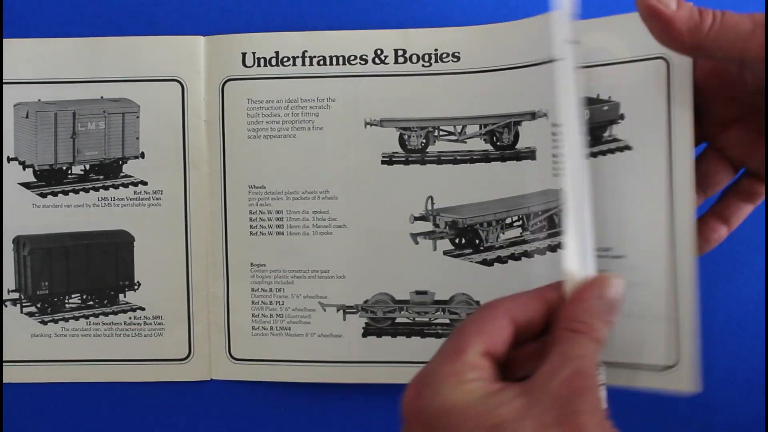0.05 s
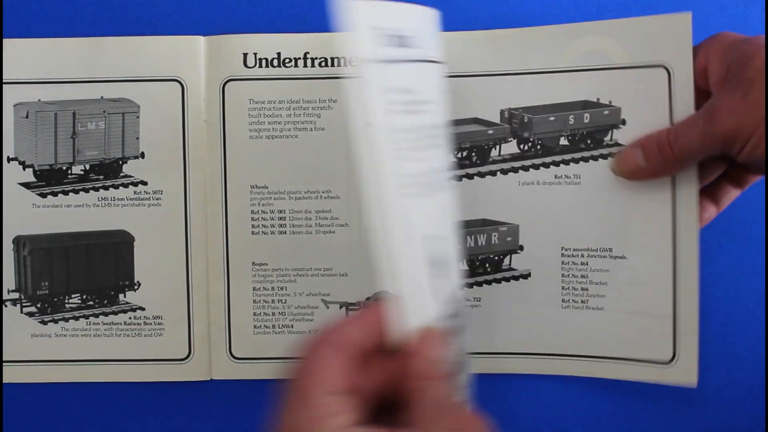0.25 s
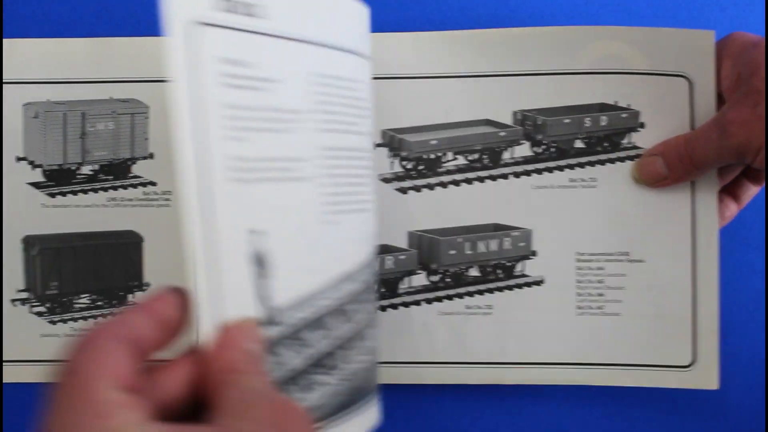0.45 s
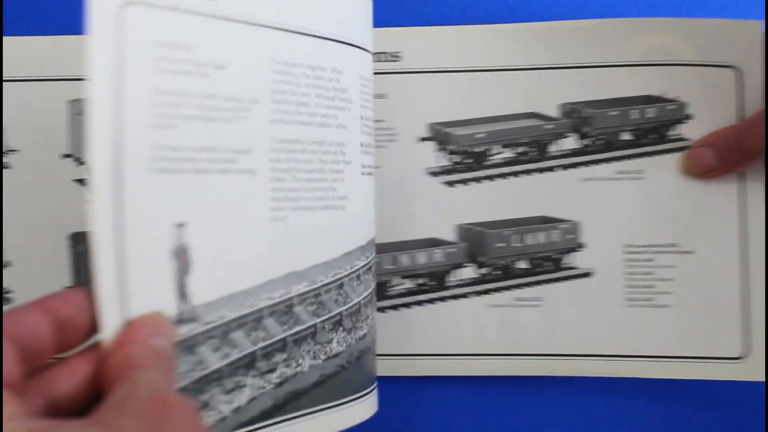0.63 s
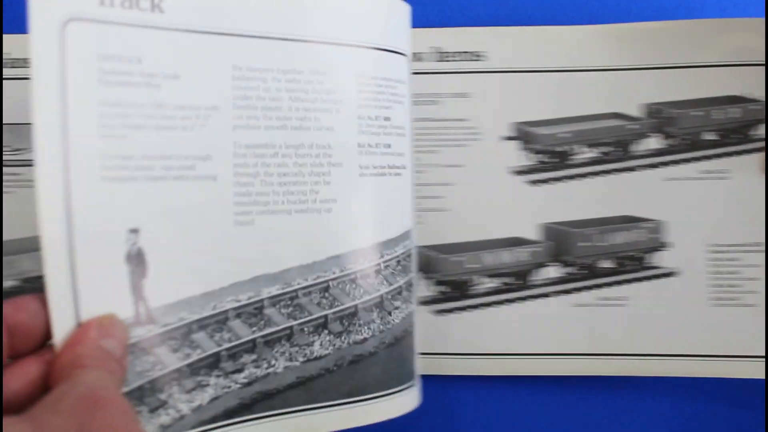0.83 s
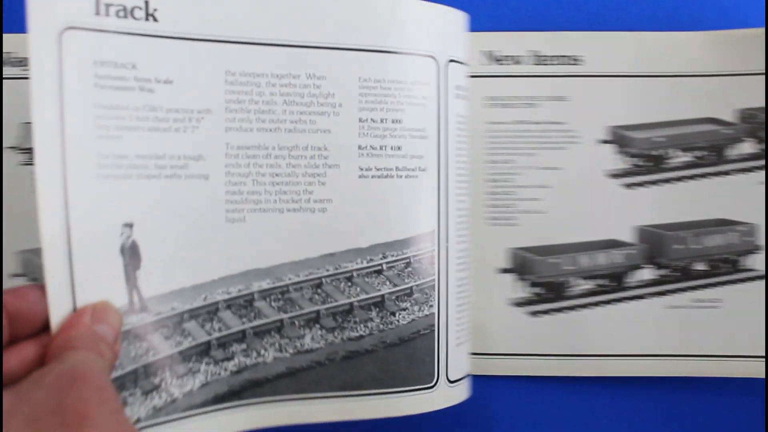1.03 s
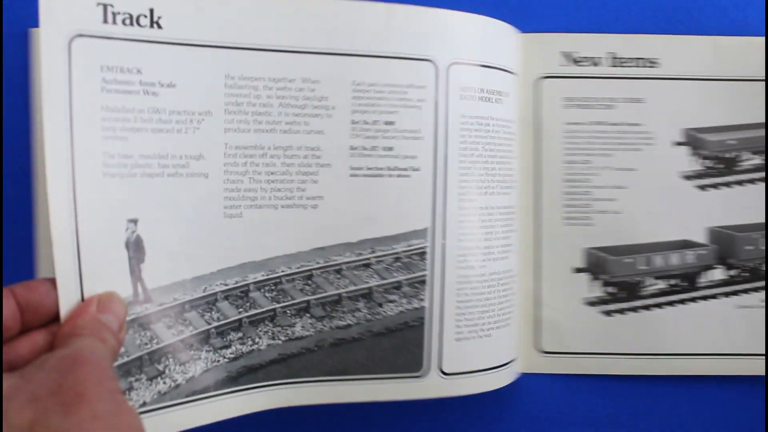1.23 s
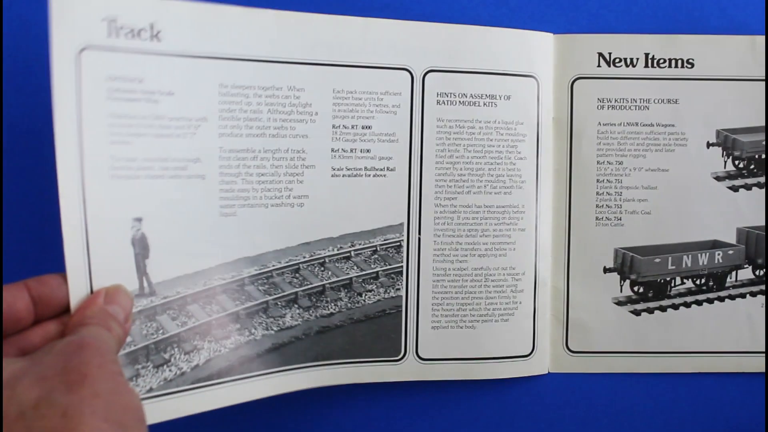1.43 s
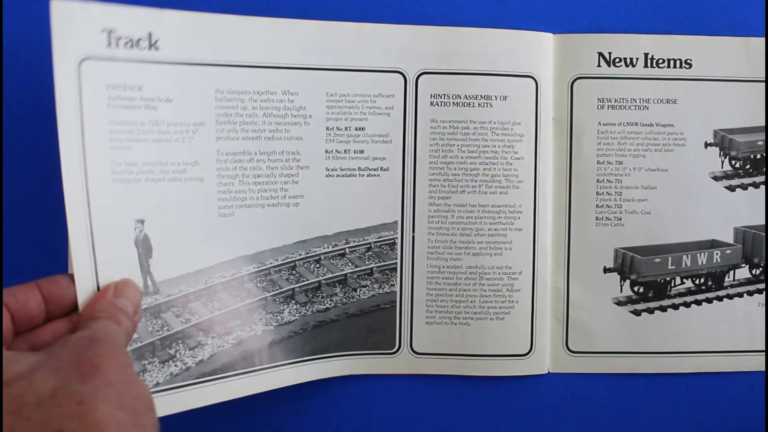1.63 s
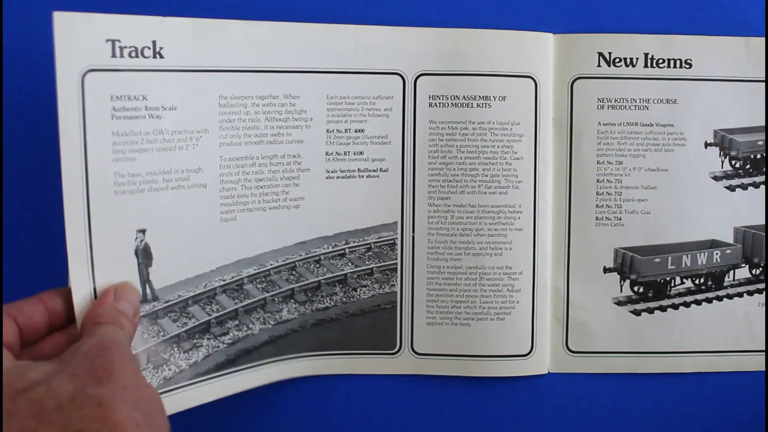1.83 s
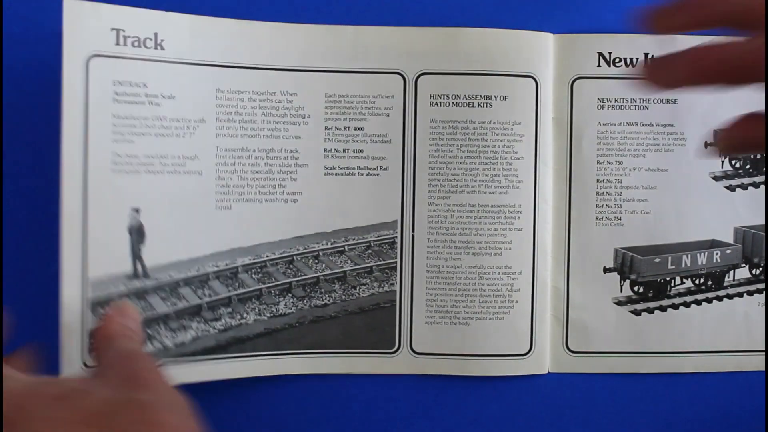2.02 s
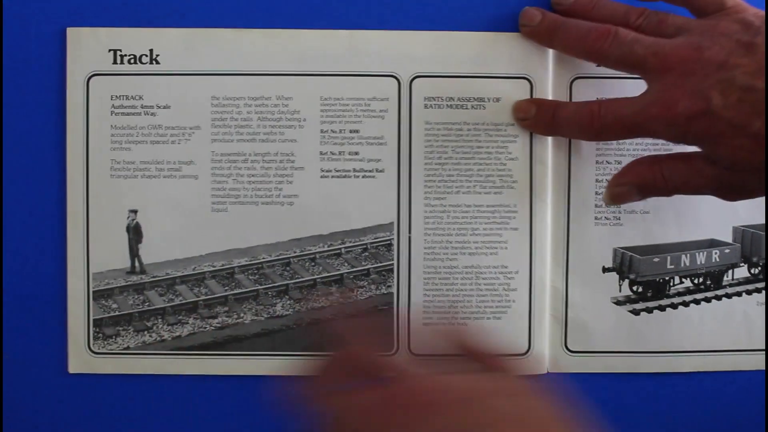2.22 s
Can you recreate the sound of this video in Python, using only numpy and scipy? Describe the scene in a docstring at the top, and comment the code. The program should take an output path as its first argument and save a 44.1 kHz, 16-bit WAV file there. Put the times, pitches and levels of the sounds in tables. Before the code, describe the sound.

A stiff catalogue page is turned close to the microphone in a small room: soft finger scraping and papery flicks, a bright sliding swish, then two sharp taps as it lands, over faint room hum.

```python
"""Turning a stiff catalogue page

A hand turns a page close to the microphone in a small room, over steady air noise and faint hum.
Fingers scrape and brush the paper: dense random clicks through filters, with a low resonant drone.
The sheet slides with a swish (the same clicks, plus a delayed copy), shivers and buckles in damped rings.
Two sharp taps, filtered impulses with table modes, land it flat."""
import sys
import numpy as np
from scipy import signal
from scipy.fft import rfft, irfft, next_fast_len
from scipy.io import wavfile
from scipy.ndimage import uniform_filter1d, map_coordinates

SR = 44100
rng = np.random.default_rng(int(sys.argv[2]) if len(sys.argv) > 2 else 0)


def to_wav(sig):
    """Store sig (one row per channel, or 1-D mono) as 16-bit WAV at the path in sys.argv[1].

    Samples outside -1..1 are clipped; the rate is SR.
    """
    pcm = np.clip(np.atleast_2d(sig), -1, 1) * 32767
    pcm = np.round(pcm).astype(np.int16)
    wavfile.write(sys.argv[1], SR, pcm.T)  # frames by channels


N = 100062

# Room air spectrum: f/Hz, relative level/dB
AIR_COLOUR = [(20, -1.5), (60, -12.5), (100, 8.5), (150, 2), (230, 2.5), (350, -2), (600, -1), (1200, -11),
              (2500, -27.5), (4300, -17), (5100, -14), (6200, -26), (9000, -24), (13000, -29), (15500, -49)]
AIR_DB = -53.5
# Hum partials: f/Hz, rms level/dB
HUM_PARTIALS = [(59, -65.5), (99, -90), (140, -62), (220, -65), (346, -70)]
HUM_WANDER_RAD, HUM_WANDER_HZ = 0.64, 7.82

# Near reflections: delay/s, level/dB
ROOM_ECHOES = [(.0061, -13.5), (.0099, -20.5)]
# Diffuse tail decay: f/Hz, t60/s
ROOM_DECAY = [(200, 0.5), (600, 0.17), (1400, 0.24), (3600, 0.19), (10000, 0.62)]
# Diffuse tail spectrum: f/Hz, relative level/dB
TAIL_COLOUR = [(100, 1), (600, 0), (1500, -2), (3200, -0.5), (6000, -10), (9000, -9), (16000, -1)]
ROOM_DB, ROOM_ONSET_S, ROOM_BUILD_S = -7, 0.004, 0.006

GRAINS_PER_S = 12000
FLUTTER_DB, RUB_FLUTTER_DB, FLUTTER_HZ = 0.8, 1.55, 45
# Fingers scraping the sheet: t/s, level before flutter/dB
RUB_LEVEL = [(0, -45.5), (.15, -46), (.18, -52), (.28, -56.5), (.34, -47), (.41, -51.5), (.6, -55.5),
             (.69, -58), (1.3, -55), (1.47, -54.5), (1.78, -60.5), (1.98, -54.5), (2.1, -62), (2.27, -63)]
# Scrape spectrum: f/Hz, relative level/dB
RUB_SPECTRUM = [(100, -14), (550, -5.5), (800, -2), (1150, -2), (1600, 1.5), (1950, -3), (2700, -9),
                (4700, -15), (7000, -24.5), (16000, -41)]
# Drone of the rubbed sheet: t/s, level/dB
DRONE_LEVEL = [(0, -48.5), (.12, -52.5), (.22, -51.5), (.36, -54), (.62, -50.5), (.72, -70), (2.27, -58)]
DRONE_HZ, DRONE_Q = 350, 5.6
# Light brushing of the moving sheet: t/s, level before flutter/dB
BRUSH_LEVEL = [(0, -50), (.035, -46.5), (.06, -57), (.15, -57.5), (.19, -47.5), (.26, -49.5), (.29, -56.5),
               (.40, -61), (.49, -55), (.57, -51), (.66, -52), (.76, -49.5), (.85, -46.5), (.92, -57),
               (1.6, -62), (1.68, -49.5), (1.71, -63.5), (2.19, -61.5), (2.23, -54), (2.27, -60)]
# Brush spectrum: f/Hz, relative level/dB
BRUSH_SPECTRUM = [(300, 2), (1000, 5), (2000, 5), (3500, 2), (5000, 1), (6500, -1.5), (9500, -3),
                  (13000, -6.5), (16000, -18)]

# Sheet sliding over its neighbour: t/s, gain/dB, spectral tilt about 4 kHz/(dB/octave)
SLIDE_PATH = [(.8, -100, 10), (.865, -41.5, 0.5), (.905, -43.5, -1), (.925, -37, -1), (.96, -36.5, -1),
              (.99, -39.5, -1.5), (1.1, -41, -0.5), (1.2, -41.5, -1.5), (1.28, -43, -1), (1.39, -46.5, -1),
              (1.43, -52, -6.5), (1.5, -100, 14)]
# Slide spectrum before tilt: f/Hz, relative level/dB
SLIDE_SPECTRUM = [(200, -18), (600, -10.5), (1500, -8.5), (2200, -5.5), (3000, 1.5), (4500, 1.5),
                  (5800, -1.5), (7500, -3), (10500, -5.5), (13500, -12), (16000, -21)]
# Lag of the swish off the page, shrinking as the sheet sinks: t/s, delay/s
REFLECTION_LAG = [(.92, .00117), (1.0, .00113), (1.15, .00099), (1.28, .00087), (1.42, .00064)]
REFLECTION_DB = -12

# Sheet shivers: t/s, level/dB, rise/s, fall/s, centre f/Hz, Q/1
SHIVERS = [(0.305, -44.5, 0.0098, 0.024, 900, 2.6), (.553, -39.5, 0.0088, 0.041, 485, 2.3),
           (0.8617, -34, 0.00056, .002, 2170, 3.7), (0.862, -35, .003, 0.023, 477, 2.3),
           (.885, -36.5, .015, 0.038, 760, 3.2), (1.402, -34, .0015, 0.011, 710, 1.8),
           (1.48, -52.5, 0.11, .04, 185, 2.4), (1.612, -23.5, 0.0034, 0.0086, 930, 2.35),
           (1.621, -42, 0.0027, 0.024, 122, 1.04), (1.645, -40.5, 0.027, 0.032, 2230, 3),
           (2.231, -51.5, 0.012, .03, 2780, 3.7)]

# Buckling flicks: t/s, level/dB, low ring f/Hz, upper ring f/Hz, upper ring level/dB,
# upper ring Q/1, crack level/dB, crumple level/dB, room level re ROOM_DB/dB
BUCKLES = [(.0345, -42, 1770, 3740, 0, 3.9, 12, 4.5, 1), (.2977, -36.5, 475, 980, 3, 3.3, 10, -7, 4),
           (.4354, -33, 454, 1600, 6, 3.6, 1, 1, -0.5), (.5298, -27.5, 493, 1310, 2.5, 3.2, 1, -0.5, 0),
           (.8614, -23.5, 800, 2000, -1.5, 9.4, -13, 2, -5),
           (1.3535, -38.5, 840, 1040, -21, 1.8, -18, 6, -15),
           (1.4094, -26.5, 810, 930, -12.5, 4.4, -26, -3.5, 7),
           (1.4192, -36, 900, 2880, 3.5, 3.5, -13, -17, -15), (1.513, -31.5, 630, 1000, -40, 3, -13, 2, -6),
           (1.9212, -33, 754, 1210, 7, 3.3, 7, -3.5, -1), (2.047, -41, 1240, 1410, 7, 8.4, -10, -4, -2),
           (2.2029, -26.5, 1880, 2400, -6.5, 6.5, -20, -7.5, -4)]
LOW_RING_Q = 2.38
# Crack spectrum: f/Hz, relative level/dB
CRACK_COLOUR = [(100, -56), (1000, 6), (3800, 2), (5500, -3.5), (7500, -7.5), (9500, -13), (13000, -17),
                (16000, -25)]
CRUMPLE_RISE_S, CRUMPLE_FALL_S = 0.0019, 0.0078

# Page landings: t/s, level/dB, rebound delay/s, rebound level/dB, crumple level/dB,
# table ring level/dB, room level re ROOM_DB/dB
LANDINGS = [(1.6157, -9, 0.00177, -3, -14, -31, 1), (1.8486, -10, 0.00133, -21, -4.5, -57.5, 0.5)]
# One spectrum per landing: f/Hz, relative level/dB
LANDING_COLOURS = [
    [(40, -31), (110, -14), (250, -19), (420, 0), (650, 3.5), (950, -1), (1500, 1), (2200, -17.5),
     (3600, -17), (5500, -25.5), (9000, -37.5), (15000, -42)],
    [(40, -20), (110, -7.5), (230, -6), (380, -9.5), (650, -0.5), (1000, 2), (1500, -1.5), (2200, -17.5),
     (3600, -21.5), (4800, -23.5), (7600, -32), (9200, -25.5), (10300, -38), (15000, -44)],
]
# Ring of the catalogue on the table: f/Hz, relative level/dB, t60/s
CATALOGUE_MODES = [(391, -2, 0.33), (516, 0, 0.34), (645, -19, .17), (674, -14, 0.16), (735, 15, 0.1),
                   (947, 11, 0.083), (1150, -25, .2), (1290, -4, 0.34), (1720, -14, .2)]

NOTCH_HZ, NOTCH_Q, TOP_HZ = 11250, 60, 15550


def undb(db):
    """Decibels to amplitude gain."""
    return 10 ** (np.asarray(db) / 20)


def unit(x):
    """Scale to unit rms."""
    return x / np.sqrt(np.mean(x ** 2))


def peak(x):
    """Scale to unit peak magnitude."""
    return x / np.max(np.abs(x))


def curve(rows, axis=1):
    """Interpolate one table column linearly in time."""
    rows = np.array(rows)
    return np.interp(np.arange(N) / SR, rows[:, 0], rows[:, axis])


def over_hz(points, hz):
    """Interpolate (Hz, value) points on a log-frequency axis."""
    points = np.array(points)
    return np.interp(np.log(np.maximum(hz, 1)), np.log(points[:, 0]), points[:, 1])


def convolve(x, response):
    """Pass x through an impulse response, keeping its length."""
    return signal.fftconvolve(x, response)[:len(x)]


def colour(x, points, size=8192):
    """Minimum-phase filter through (Hz, dB) points, by cepstral folding."""
    hz = np.arange(size // 2 + 1) * SR / size
    cepstrum = irfft(np.log(undb(over_hz(points, hz))))
    cepstrum[1:size // 2] *= 2
    cepstrum[size // 2 + 1:] = 0
    return convolve(x, irfft(np.exp(rfft(cepstrum))))


def resonate(x, hz, q):
    """Damped resonance: two cascaded peak filters, each of half the nominal Q."""
    b, a = signal.iirpeak(hz, max(q, 0.5) / 2, fs=SR)
    once = signal.lfilter(b, a, x)
    return signal.lfilter(b, a, once)


def pulse(at_s):
    """Unit impulse at the given time."""
    x = np.zeros(N)
    x[int(np.clip(round(at_s * SR), 0, N - 1))] = 1
    return x


def swell(at_s, rise_s, fall_s):
    """Exponential rise to one at the given time, then exponential decay."""
    t = np.arange(N) / SR - at_s
    return np.exp(np.minimum(t / rise_s, -t / fall_s))


def walk(rate_hz):
    """Smooth random wander of about unit rms: held random values, box-averaged."""
    k = int(SR / rate_hz)
    steps = np.repeat(rng.standard_normal(N // k + 1), k)
    return unit(uniform_filter1d(steps, k)[:N])


def octaves(x, count=9):
    """Split x into overlapping octave bands: (centre Hz, band) pairs."""
    centres = 16000 / 2 ** np.arange(count)[::-1]
    half = next_fast_len(len(x))
    spectrum = rfft(x, 2 * half)
    hz = np.linspace(0, SR / 2, half + 1)
    bands = []
    for centre in centres:
        weight = over_hz(np.c_[centres, centres == centre], hz)
        bands.append((centre, irfft(spectrum * weight)[:len(x)]))
    return bands


def in_room(x, room_db):
    """Direct sound, two near echoes and a diffuse tail with frequency-dependent decay."""
    t = np.arange(SR // 2) / SR
    noise = rng.standard_normal(len(t))
    tail = sum(band * undb(-60 * t / over_hz(ROOM_DECAY, hz)) for hz, band in octaves(noise))
    tail = colour(tail, TAIL_COLOUR) * np.clip((t - ROOM_ONSET_S) / ROOM_BUILD_S, 0, 1)
    response = undb(ROOM_DB + room_db) * tail / np.linalg.norm(tail)
    for delay_s, db in ROOM_ECHOES:
        response[int(delay_s * SR)] += undb(db)
    return x + convolve(x, response)


def slips():
    """Paper fibres catch and let go: dense random clicks of uneven size."""
    return (rng.random(N) < GRAINS_PER_S / SR) * rng.standard_normal(N)


def friction(points, flutter_db):
    """Slips coloured by the paper, under uneven pressure (flutter in dB rms)."""
    return unit(colour(slips(), points)) * undb(flutter_db * walk(FLUTTER_HZ))


def buckle(at_s, crumple_db):
    """Force of one snap: an impulse inside a brief noise flurry of smaller creases."""
    flurry = rng.standard_normal(N) * swell(at_s, CRUMPLE_RISE_S, CRUMPLE_FALL_S)
    return pulse(at_s) + undb(crumple_db) * flurry / np.linalg.norm(flurry)


def room_tone():
    """Steady coloured air noise and faint hum partials with wandering phase."""
    t = np.arange(N) / SR
    hum = 0
    for hz, db in HUM_PARTIALS:
        phase = 2 * np.pi * hz * t + HUM_WANDER_RAD * walk(HUM_WANDER_HZ)
        hum = hum + undb(db) * np.sqrt(2) * np.sin(phase)  # sqrt(2): rms to peak
    air = unit(colour(rng.standard_normal(N), AIR_COLOUR))
    return undb(AIR_DB) * air + hum


def handling():
    """Fingers scrape the sheet and make it drone while its edge brushes along."""
    scrape = friction(RUB_SPECTRUM, RUB_FLUTTER_DB) * undb(curve(RUB_LEVEL))
    drone = unit(resonate(slips(), DRONE_HZ, DRONE_Q)) * undb(curve(DRONE_LEVEL))
    brush = friction(BRUSH_SPECTRUM, FLUTTER_DB) * undb(curve(BRUSH_LEVEL))
    return scrape + drone + brush


def swish():
    """Sliding friction of varying tilt; its shortening reflection sweeps a comb colour upward."""
    tilt_db = curve(SLIDE_PATH, axis=2)
    bands = octaves(friction(SLIDE_SPECTRUM, FLUTTER_DB))
    hiss = sum(band * undb(tilt_db * np.log2(hz / 4000)) for hz, band in bands)
    delayed_samples = np.arange(N) - curve(REFLECTION_LAG) * SR
    reflected = map_coordinates(hiss, [delayed_samples], mode="mirror")
    return (hiss + undb(REFLECTION_DB) * reflected) * undb(curve(SLIDE_PATH))


def rustles():
    """Short shivers of the sheet: enveloped slips, each in one broad resonance."""
    out = 0
    for at_s, db, rise_s, fall_s, hz, q in SHIVERS:
        shiver = unit(resonate(slips(), hz, q))
        out = out + undb(db) * swell(at_s, rise_s, fall_s) * shiver
    return out


def flicks():
    """The bending sheet buckles: each snap drives two quickly damped rings and a crack."""
    push, out = pulse(0)[:SR // 10], 0
    crack = peak(colour(push, CRACK_COLOUR))
    for at_s, db, low_hz, upper_hz, upper_db, upper_q, crack_db, crumple_db, room_db in BUCKLES:
        low = peak(resonate(push, low_hz, LOW_RING_Q))
        upper = undb(upper_db) * peak(resonate(push, upper_hz, upper_q))
        response = low + upper + undb(crack_db) * crack
        flick = convolve(buckle(at_s, crumple_db), response)
        out = out + undb(db) * in_room(flick, room_db)
    return out


def taps():
    """The page snaps flat and rebounds; decaying modes ring the catalogue on the table."""
    t, ring, out = np.arange(SR // 2) / SR, 0, 0
    for hz, db, t60_s in CATALOGUE_MODES:
        ring = ring + undb(db) * np.sin(2 * np.pi * hz * t) * np.exp(-np.log(1000) * t / t60_s)
    for landing, points in zip(LANDINGS, LANDING_COLOURS):
        at_s, db, rebound_s, rebound_db, crumple_db, ring_db, room_db = landing
        force = buckle(at_s, crumple_db) + undb(rebound_db) * pulse(at_s + rebound_s)
        slap = convolve(force, peak(colour(pulse(0)[:len(t)], points)))
        table = undb(ring_db) * convolve(pulse(at_s), ring)
        out = out + undb(db) * (in_room(slap, room_db) + table)
    return out


def scene():
    """Sum of all sources at one microphone."""
    return (room_tone() + handling() + swish() + rustles() + flicks() + taps())[None]


def record(dry):
    """Recorder: narrow treble notch, then a steep elliptic low-pass."""
    notched = signal.lfilter(*signal.iirnotch(NOTCH_HZ, NOTCH_Q, fs=SR), dry)
    # order 10, 0.2 dB ripple, 80 dB stopband
    low_pass = signal.ellip(10, 0.2, 80, TOP_HZ, fs=SR, output="sos")
    return signal.sosfilt(low_pass, notched)


dry = scene()
out = record(dry)
to_wav(out)
```